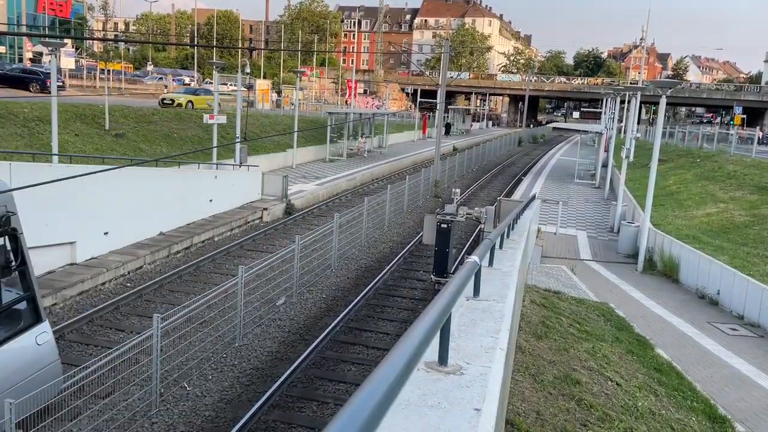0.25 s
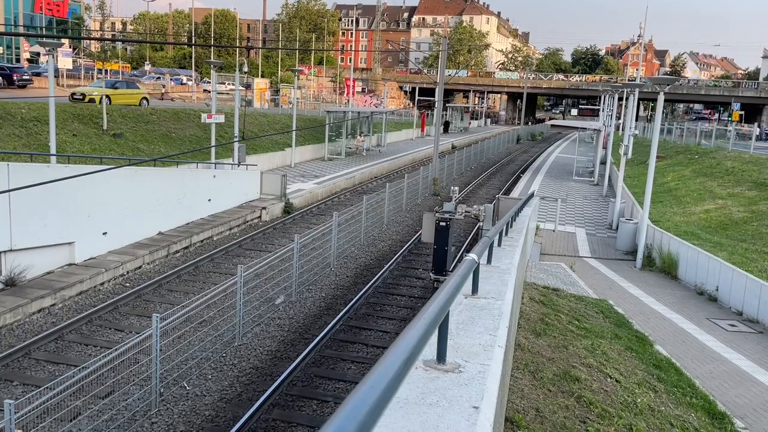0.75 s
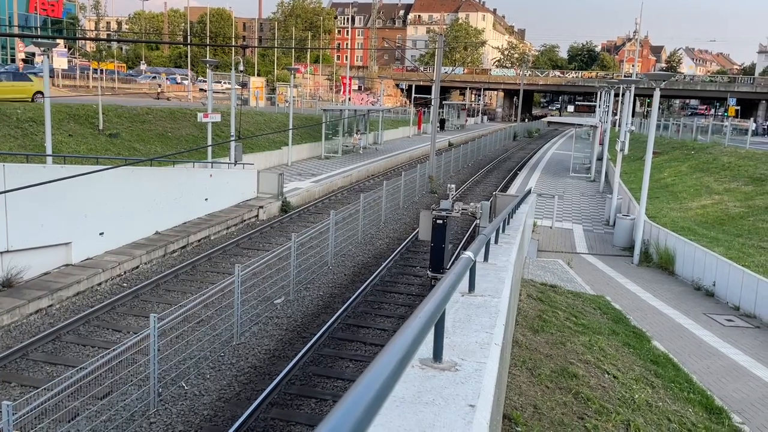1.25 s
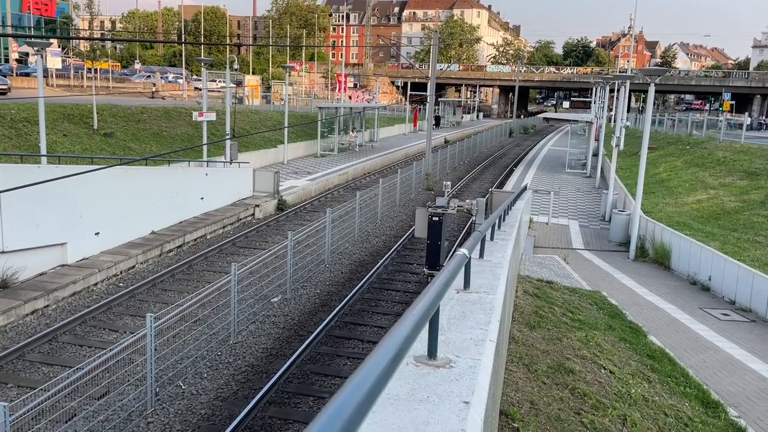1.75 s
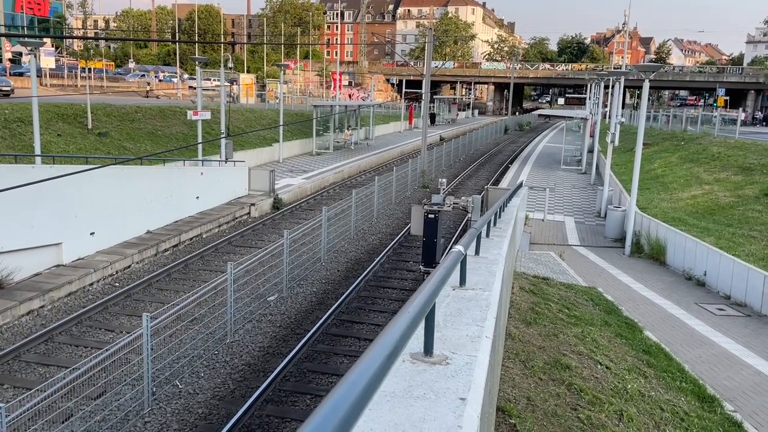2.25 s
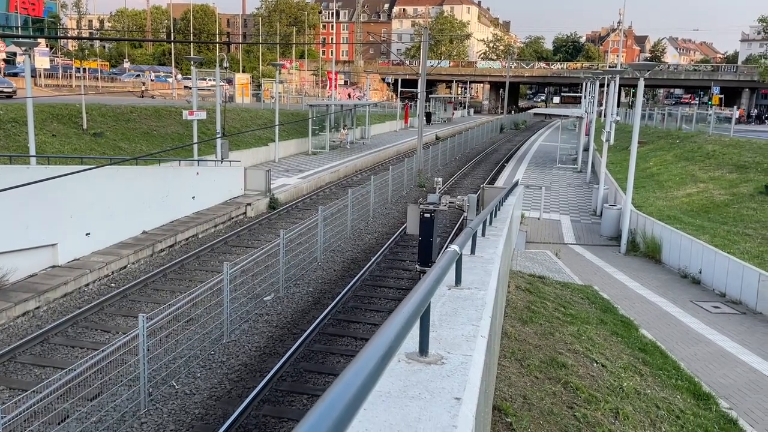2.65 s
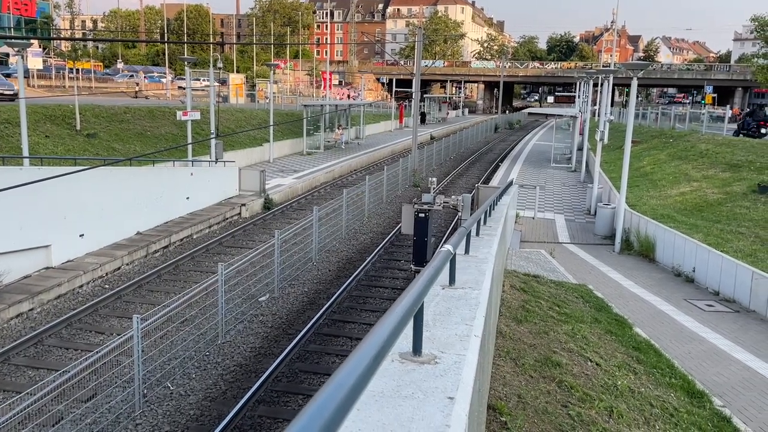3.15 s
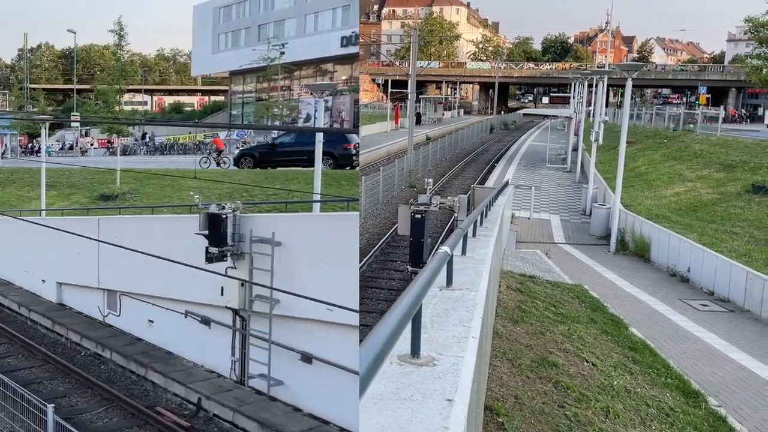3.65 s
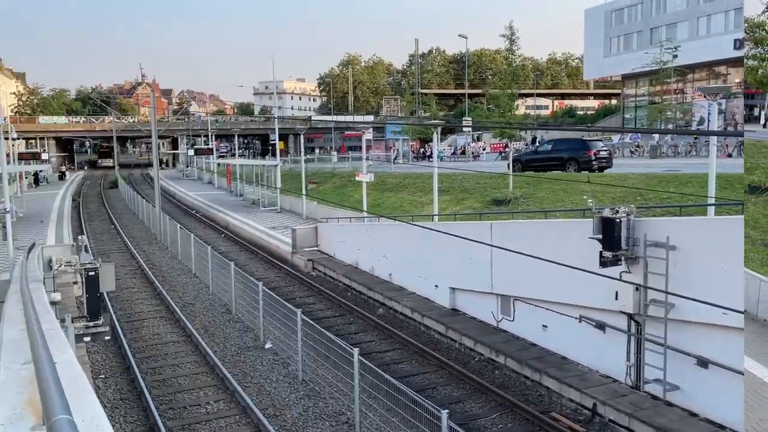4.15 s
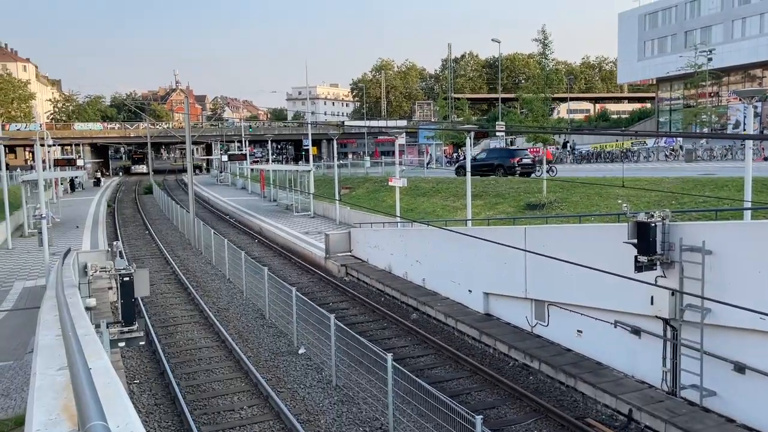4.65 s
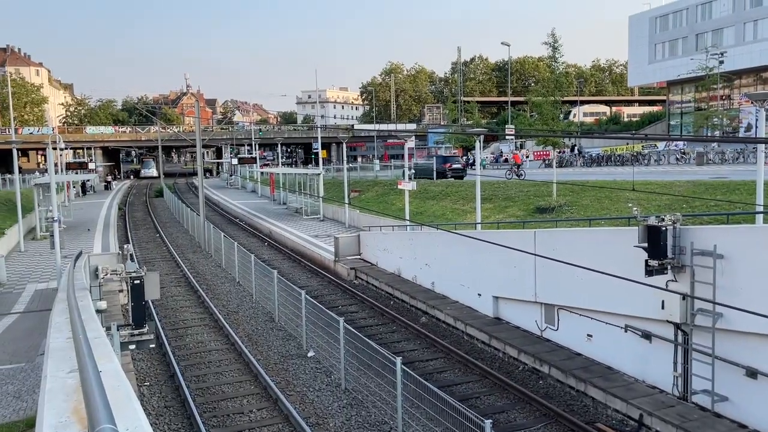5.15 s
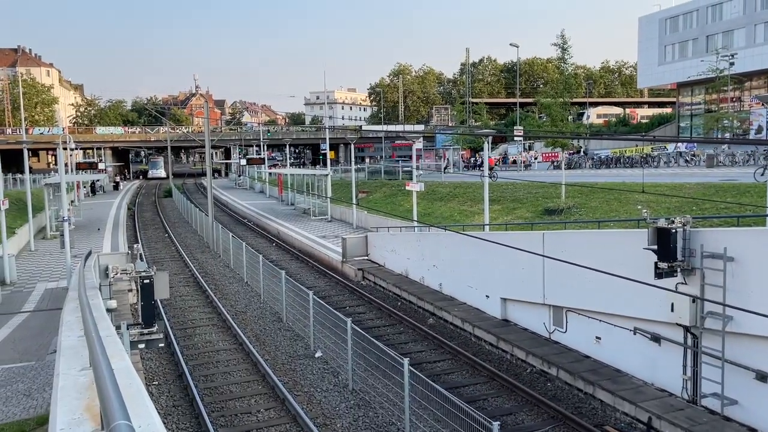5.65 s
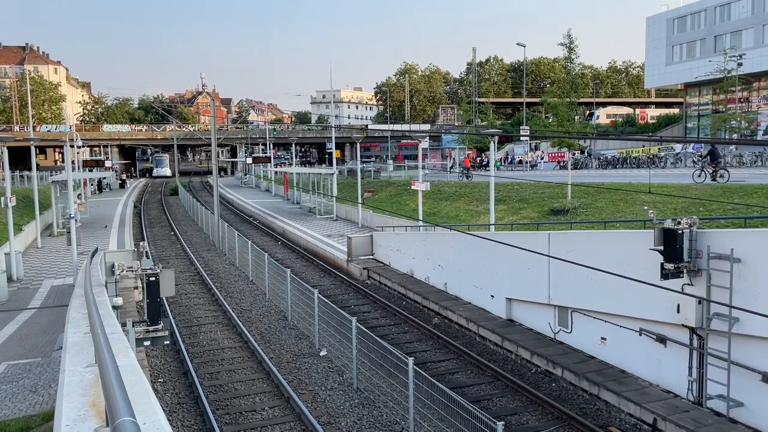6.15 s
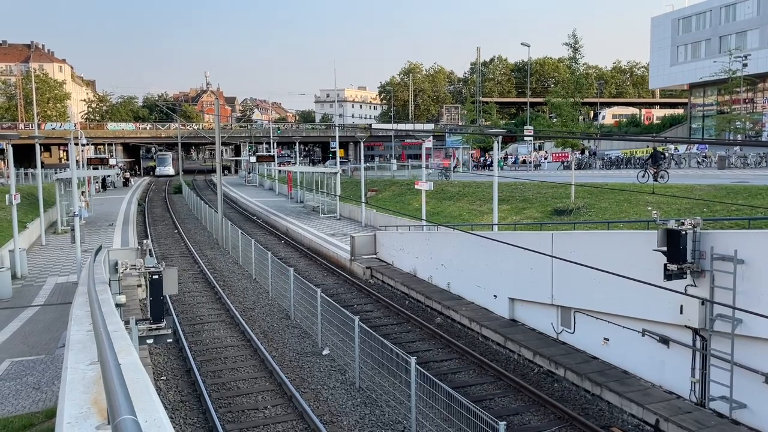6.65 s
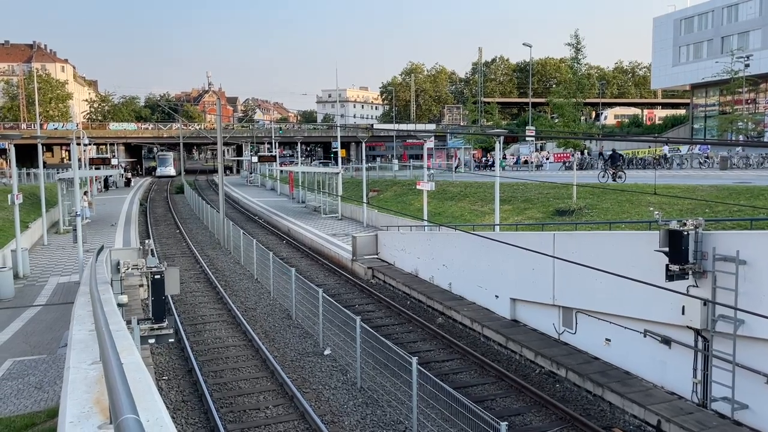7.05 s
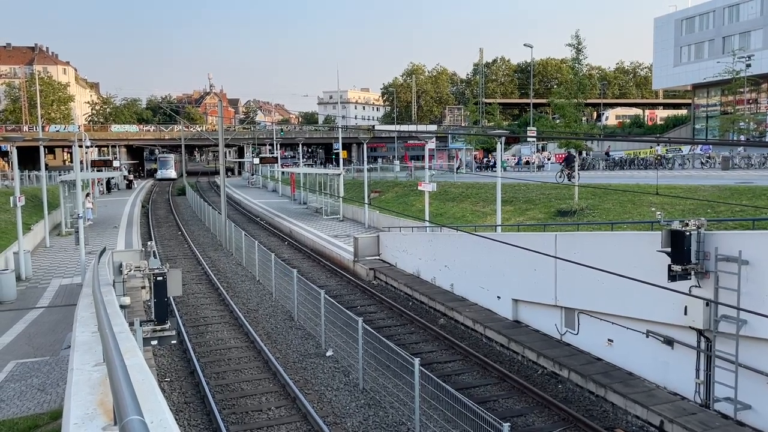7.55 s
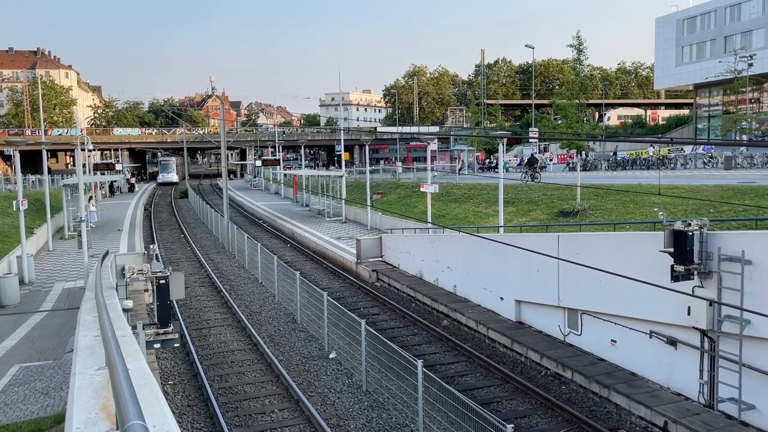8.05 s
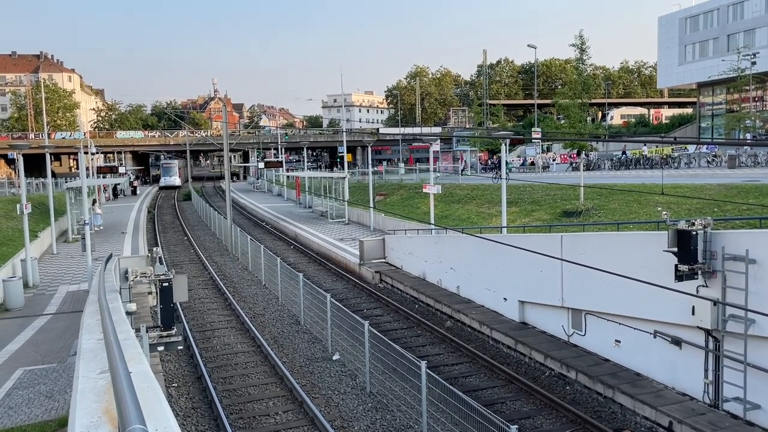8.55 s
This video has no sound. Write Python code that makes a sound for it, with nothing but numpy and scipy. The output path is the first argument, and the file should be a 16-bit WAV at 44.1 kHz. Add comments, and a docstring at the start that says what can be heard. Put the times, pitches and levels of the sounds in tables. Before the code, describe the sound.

Close stereo outdoor pickup beside sunken tracks: heavy train rumble, juddering wheel roar, metallic ringing and irregular clacks dominate the first three and a half seconds, then drop quickly. The distant town appears, low traffic throb and soft tyre wash, with one car humming past. Faint high wheel cries come and go from a far train. A small grainy metal rattle sounds just after seven seconds, then a few muffled low thuds around eight.

```python
"""A light-rail train rolls close by on the left in a concrete cutting: roaring noise, deep booms and decaying knocks.
The near sound fades out around the fourth second and leaves the town: filtered-noise traffic and a sine engine drone.
The wheels of a far train sing thinly in the curve, as noise in narrow resonances.
Near the end loose metal gives a short double clatter of grainy noise, and a few dull sine thuds follow."""
import sys
import numpy as np
from scipy import signal
from scipy.fft import rfft, irfft, next_fast_len
from scipy.io import wavfile
from scipy.ndimage import uniform_filter1d

SR = 44100
rng = np.random.default_rng(int(sys.argv[2]) if len(sys.argv) > 2 else 0)


def to_wav(sig):
    """Store sig (one row per channel, or 1-D mono) as 16-bit WAV at the path in sys.argv[1].

    Samples outside -1..1 are clipped; the rate is SR.
    """
    pcm = np.clip(np.atleast_2d(sig), -1, 1) * 32767
    pcm = np.round(pcm).astype(np.int16)
    wavfile.write(sys.argv[1], SR, pcm.T)  # frames by channels


N = 387638
TIME_S = np.arange(N) / SR

# All levels are relative: later gains and the stereo stage shift them. Swell lengths are those of swell().

# The near train going by. Each row: time in seconds, wheel roar in dB, rail hiss in dB, body rumble in dB.
PASS_LEVELS = [(0, -21.5, -44, -0.5), (1.75, -23, -44, -0.5), (2.3, -25.5, -46.5, -0.5),
               (3.05, -25, -49, -0.5), (3.41, -27.5, -50, -2.5), (3.52, -31, -54, -3.5),
               (3.8, -34, -58, -7), (4.05, -41.5, -65, -17)]
# Spectrum of the wheel roar. Each row: frequency in Hz, density in dB.
ROAR_COLOUR = [(22, -29), (42, -26.5), (65, -1), (120, -3.5), (230, -1), (300, -1), (500, -4), (700, -8),
               (950, -10), (1250, -17), (1800, -19), (2400, -29.5), (4000, -53)]
# Spectrum of the rail hiss. Each row: frequency in Hz, density in dB.
HISS_COLOUR = [(900, -25), (1700, -6), (2350, -6.5), (3200, -11.5), (3900, -14), (4450, -15), (5200, -17),
               (6500, -19.5), (7900, -28.5), (10500, -31.5), (13000, -38)]
# Wheel and rail modes kept ringing by rolling. Each row: frequency in Hz at the loudest time, pole width in Hz,
# level in dB, loudest time in seconds, rise in seconds, fall in seconds, glide in Hz per second.
RAIL_MODES = [(1704, 740, -3.5, 0.89, 2, 2, 0), (1770, 260, 7.5, .9, .2, 0.35, 600.5),
              (2186, 140, 4, 0.74, .25, 0.13, 1), (2260, 220, 1.5, 1.2, 0.19, 0.5, 2),
              (2640, 200, -6.5, 3.6, 1.1, .87, 0), (4390, 380, -6.5, 1.8, 1.7, 0.3, -130),
              (4450, 45, -9.5, 1.5, 1.1, 1.1, 0), (5420, 90, -15, .1, .5, 1.9, 1),
              (5850, 45, -19, 1.2, 1.2, 1.2, 0), (6530, 430, -13, 0.55, 0.38, 1.5, -150)]
# Deep resonances of car body and track bed. Each row: frequency in Hz, pole width in Hz, level in dB.
BODY_MODES = [(88.77, 41.5, -24.5), (175, 71.4, -20.5)]
# Booms that stand out of the rumble. Each row: peak in seconds, length in seconds, frequency in Hz, level in dB.
BOOMS = [(0.033, 0.068, 163, -15), (0.34, 0.13, 93.9, -17.5), (0.377, .24, 212, -21),
         (0.487, 0.077, 97, -19.5), (0.541, 0.075, 164.7, -16), (0.722, 0.14, 178.5, -17.5),
         (0.726, 0.14, 90, -24), (0.911, 0.17, 177.8, -13), (1.012, 0.047, 185, -14.5),
         (1.33, 0.19, 96.7, -23.5), (1.56, 0.039, 162.7, -12), (1.66, 0.085, 166.9, -9.5),
         (1.79, 0.21, 178.7, -20.5), (2.068, 0.065, 88, -20), (2.254, 0.14, 177.5, -15),
         (2.42, 0.15, 85.1, -16.5), (2.586, 0.16, 87.25, -19.5), (2.603, 0.13, 162, -18),
         (2.845, 0.12, 91, -20), (2.926, 0.36, 184.2, -21.5), (3.405, 0.083, 95, -19)]
# Brief dips of the rumble. Each row: centre in seconds, length in seconds, gain in dB.
LULLS = [(0.226, 0.09, 0), (0.8, 0.05, -5), (1.127, 0.04, -19), (1.982, 0.099, -9.5), (3.56, 0.046, -2),
         (3.787, .07, -4.5)]
# Wheels knocking on the rails. Each row: start in seconds, ring in dB, ring pitch in Hz, thump in dB, crack in dB.
KNOCKS = [(0.027, -11, 420, -22, -33), (0.106, -1.5, 480, -2, -20), (0.126, -5, 470, -13, -28),
          (0.139, -5.5, 520, -16, -29), (0.17, -11, 450, -20, -35), (0.216, -13, 400, -22, -35),
          (0.288, -5.5, 500, 2, -22), (0.308, -11, 600, -16, -35), (0.385, -8.5, 400, -13, -32),
          (0.468, -2, 500, -13, -29), (0.487, -6, 470, -20, -34), (0.518, -7, 440, -18, -34),
          (0.538, -10, 480, -14, -35), (0.619, -10, 350, -12, -35), (0.658, -2, 470, -6, -31),
          (0.837, -7, 520, -14, -32), (0.858, -9, 480, -22, -35), (1.03, -9, 560, -22, -36),
          (1.057, -5.5, 430, -12, -33), (1.208, -8, 380, -15, -35), (1.323, -9, 800, -22, -34),
          (1.455, -10.5, 400, -13, -32), (1.585, -10, 440, -20, -35), (1.628, -9, 480, -22, -35),
          (1.68, -12, 480, -22, -36), (1.794, -9.5, 420, -12, -34), (1.945, -7, 450, -22, -34),
          (2.14, -13, 480, -16, -35), (2.324, -12.5, 480, -16, -38), (2.433, -15, 700, -24, -37),
          (2.512, -14, 480, -20, -38), (3.004, -10, 530, -18, -36), (3.094, -10.5, 400, -17, -42),
          (3.615, -14.5, 440, -23, -47), (3.678, -14.5, 440, -25, -49)]
# Bogie modes struck by a knock. Each row: multiple of the ring pitch, level in dB, t60 in seconds.
BOGIE_MODES = [(0.661, 2, 0.07), (0.819, -2.5, 0.11), (1, 1, 0.097), (1.19, -1, 0.059), (1.45, -5, 0.058),
               (1.83, -6.5, 0.064), (2.3, -28, .04)]
# Microphone pair facing the near train. Each row: frequency in Hz, coherence from 0 to 1,
# phase lead of left in radians, left minus right in dB.
NEAR_STEREO = [(45, 1, 0.12, -1), (161, 0.95, 0.45, -3.5), (326, 0.67, 1.3, -0.5), (664, 0.77, 1.7, 2),
               (940, 0.86, 1.64, 0.5), (1250, 1, 2.16, -1.5), (1560, 0.62, 2.74, -5),
               (1904, 0.65, 3.36, -1.5), (2660, 0.41, 6.4, -1.5), (3340, 0.18, 7.8, -1.5),
               (4400, 0.98, 7.44, -0.5), (5160, 0.12, 6.1, -1.5), (5780, 0.92, 4.74, -3.5),
               (12070, 1, 14.17, 1)]

# Wheels of the far train: one faint held note: peak in seconds, length in seconds, frequency in Hz, level in dB.
HELD_NOTE = (5.35, 4.0, 2620, -58.5)
# Cries that stand out of it. Each row: peak in seconds, length in seconds, frequency in Hz, level in dB.
CRIES = [(4.2, .3, 2625, -58), (4.46, .14, 2615, -56), (4.61, .13, 2606, -52.5), (4.76, .1, 2612, -53),
         (4.9, .12, 2640, -55), (5.0, .12, 2605, -54), (4.92, .6, 2265, -56.5), (5.33, .1, 2620, -53),
         (5.44, .1, 2290, -57), (5.8, .5, 2295, -62), (6.15, .11, 2572, -52), (6.3, .18, 2580, -57),
         (7.0, .16, 2632, -56), (7.02, .18, 2552, -57.5), (7.08, .4, 2380, -61), (7.27, .08, 2550, -59),
         (7.5, .22, 2546, -57)]
# Flange scrape: peak in seconds, length in seconds, frequency in Hz, pole width in Hz, level in dB.
SCRAPE = (4.2, 0.5, 2920, 180, -58)
# Engine on the road. Each row: time in seconds, firing frequency in Hz, level in dB.
ENGINE_DRONE = [(3.75, 59, -38), (3.95, 60, -30.5), (4.2, 63, -28.5), (4.4, 64, -28.5), (4.62, 64.5, -26.5),
                (4.83, 64, -30), (5.0, 62, -37), (5.2, 60, -44)]
# Jolts of loose metal. Each row: start in seconds, rattle in dB, ping in dB, t60 in seconds.
CLATTERS = [(7.201, -50, -63, .14), (7.216, -54.5, -65, .14), (7.236, -47, -59.5, .1),
            (7.253, -59, -69, .45), (7.35, -64, -75, .6), (7.385, -66, -76, .5), (8.066, -73, -70, .25)]
# Spectrum of the rattling metal. Each row: frequency in Hz, density in dB.
CLATTER_COLOUR = [(600, -22), (1500, -6), (2850, 0), (3120, -4), (3350, 1), (4050, -10), (4480, -4.5),
                  (5400, -14), (6700, -11), (7500, -21), (8400, -17), (9400, -24), (12000, -31),
                  (14000, -47)]
# Dull far thuds. Each row: start in seconds, pitch in Hz, level in dB.
THUDS = [(8.005, 85, -24), (8.04, 58, -25), (8.16, 160, -26), (8.175, 60, -24), (8.21, 56, -19),
         (8.425, 65, -27), (8.512, 90, -18.5)]
# Tyres of the passing car. Each row: time in seconds, centre in Hz, level in dB.
TYRE_SIZZLE = [(4.1, 5300, -83), (4.35, 5560, -78), (4.75, 5850, -75), (5.15, 6200, -77), (5.5, 6450, -84)]
# Hollow far tone. Each row: peak in seconds, length in seconds, level in dB.
GROANS = [(4.43, .12, -50), (4.95, 0.09, -39.5)]
# Town traffic. Each row: time in seconds, rumble in dB, tyre wash in dB, deep throb in dB.
TRAFFIC_LEVELS = [(4.1, -42.5, -46, -38.5), (4.7, -44.5, -45.5, -44), (5.5, -43.5, -48, -36),
                  (6.05, -44, -49, -42), (6.6, -45.5, -50, -39.5), (7.2, -44.5, -49.5, -39),
                  (7.9, -45, -50, -39), (8.3, -43, -50, -37), (8.79, -43.5, -50, -43)]
# Spectrum of the deep throb. Each row: frequency in Hz, density in dB.
THROB_COLOUR = [(18, -16), (32, -1), (50, 26.5), (70, 8), (100, -1.5), (200, -60)]
# Spectrum of the traffic rumble. Each row: frequency in Hz, density in dB.
RUMBLE_COLOUR = [(45, -20.5), (85, 0.5), (160, -5), (230, -11.5), (330, -17.5), (700, -56)]
# Spectrum of the tyre wash. Each row: frequency in Hz, density in dB.
WASH_COLOUR = [(120, -5.5), (300, -2.5), (500, -1.5), (660, -5.5), (1000, -6.5), (1400, -12.5),
               (2100, -16.5), (3000, -25), (4500, -37)]
# Spectrum of the far hiss. Each row: frequency in Hz, density in dB.
FAR_HISS_COLOUR = [(1800, -18), (3400, 0), (4200, -4.5), (5600, -9), (6800, -12), (8400, -24), (9800, -31),
                   (11200, -30), (13000, -41)]
# The same pair in the open town. Each row: frequency in Hz, coherence from 0 to 1,
# phase lead of left in radians, left minus right in dB.
FAR_STEREO = [(45, 0.92, 0.03, -2), (170, 1, 0.37, -2), (340, 0.8, 0.13, -2), (620, 0.72, 0.66, 0.5),
              (1300, 0.23, 0.36, -2), (2780, 0.27, 0.8, -0.2), (6000, 0.091, -1.5, -0.5),
              (7100, .1, -3.5, -2), (8100, 1, -6.5, -1), (9800, .3, -4, 3), (11200, .8, -6.3, -2)]

THUMP_HZ, THUMP_T60_S, CRACK_T60_S = 149, 0.057, .06
STRIKE_ATTACK_S = .0022  # knocks and clatter
THUD_ATTACK_S, THUD_T60_S = .003, .17
ECHO_DELAY_S, ECHO_SHRINK_S_PER_S = .00068, .000095  # delay holds at the echo's peak
ECHO_PEAK_S, ECHO_LENGTH_S, ECHO_GAIN = 4.8, 1.6, .2
LOW_CUT_HZ, EDGE_HZ, CEILING = 33, 14200, .92


def gain_of(db):
    """Amplitude factor of a level in dB."""
    return 10 ** (np.asarray(db) / 20)


def evened(x):
    """Scales to rms 1."""
    return x / np.sqrt(np.mean(x ** 2) + 1e-20)


def read(points, hz):
    """Every column of a table, joined on a log-frequency axis."""
    f, *columns = np.transpose(points)
    return [np.interp(np.log(hz + 1), np.log(f + 1), c) for c in columns]


def levels(rows, fade_db_per_s=50):
    """Gains from the dB columns of a curve; outside its times they fall steadily."""
    s, *columns = np.transpose(rows)
    outside_s = np.maximum(s[0] - TIME_S, 0) + np.maximum(TIME_S - s[-1], 0)
    return [gain_of(np.interp(TIME_S, s, c) - fade_db_per_s * outside_s) for c in columns]


def add(mix, start_s, sound):
    """Adds a sound into the mix, cut off at the end."""
    part = mix[..., max(round(start_s * SR), 0):][..., :sound.shape[-1]]
    part += sound[..., :part.shape[-1]]


def swell(peak_s, length_s):
    """A smooth rise and fall, about 9 dB down at the ends of its length."""
    return np.exp(-np.minimum((2 * (TIME_S - peak_s) / length_s) ** 2, 20))


def swells(rows):
    """The summed gain of several swells."""
    return sum(gain_of(db) * swell(s, length_s) for s, length_s, db in rows)


def wander(hz):
    """Random fluctuation of rms 1, low-passed softly around hz."""
    size = next_fast_len(N, True)
    smooth = np.exp(-np.minimum(np.fft.rfftfreq(size, 1 / SR) / hz, 10) ** 2)
    return evened(irfft(rfft(rng.standard_normal(size)) * smooth, size)[:N])


def steadied(x, window_s):
    """Takes out swells slower than the window and keeps the fast beating."""
    power = uniform_filter1d(x ** 2, max(int(window_s * SR), 1), axis=-1)
    return x / np.sqrt(abs(power) + 1e-12)


def tone(hz, waver):
    """A sine of rms 1 whose pitch strays by the share waver."""
    return evened(np.sin(2 * np.pi * (rng.random() + np.cumsum(hz * (1 + waver)) / SR)))


def noise(colour, patchy_db, size=1024, skirt_db_per_octave=30):
    """Two unrelated noises of one colour, patchy in time and frequency, falling steadily above its top."""
    hz, _, z = signal.stft(rng.standard_normal((2, N)), SR, nperseg=size)
    patches = uniform_filter1d(rng.standard_normal(z.shape[1:]), size=10, axis=0)
    patches = evened(uniform_filter1d(patches, size=6, axis=1))
    octaves_above = np.log2(np.maximum(hz / colour[-1][0], 1))
    shape_db = read(colour, hz)[0] - skirt_db_per_octave * octaves_above
    shaped = z * gain_of(shape_db[:, None] + patchy_db * patches)
    return evened(signal.istft(shaped, SR, nperseg=size)[1][:, :N])


def ringing(hz, width_hz, size=N):
    """Two unrelated noises in a double-pole resonance, whose centre may move."""
    r = np.exp(-np.pi * width_hz / SR)
    drive = rng.standard_normal((2, 2, size + SR // 8))  # the extra eighth lets the filter settle
    slow = signal.lfilter([1], [1, -2 * r, r * r], drive)[..., -size:]
    angle = 2 * np.pi * np.cumsum(hz * np.ones(size)) / SR
    return evened(slow[0] * np.cos(angle) + slow[1] * np.sin(angle))


def rolling(roar_db=3, hiss_db=7.5, judder_db=0.4, flicker_db=0.67):
    """Rough steel on steel: juddering roar, hiss, and modes that swell, glide and rasp as their wheels go by."""
    roar_gain, hiss_gain, _ = levels(PASS_LEVELS)
    judder = wander(47)
    roar = steadied(noise(ROAR_COLOUR, patchy_db=1.5, size=2048), 0.056)
    roar = roar * roar_gain * gain_of(roar_db + judder_db * judder)
    hiss = noise(HISS_COLOUR, patchy_db=1.16) * gain_of(hiss_db + flicker_db * judder)
    modes = 0
    for hz, width_hz, db, s, rise_s, fall_s, glide_hz_per_s in RAIL_MODES:
        passing = np.exp(-((TIME_S - s) / np.where(TIME_S < s, rise_s, fall_s)) ** 2)
        flutter_db = 1.5 * wander(12) + 1.5 * wander(90)
        mode = ringing(hz + glide_hz_per_s * (TIME_S - s), width_hz)
        modes = modes + gain_of(db + flutter_db) * passing * mode
    return roar + hiss_gain * (hiss + modes)


def booming(surge_db=1.2, boom_db=-1.5, waver=0.02):
    """Two deep resonances churn as the train passes, with brief dips; now and then a sine booms out."""
    lull_db = sum(db * swell(s, length_s) for s, length_s, db in LULLS)
    rumble = sum(steadied(ringing(hz, width_hz), .08) * gain_of(db + surge_db * wander(20))
                 for hz, width_hz, db in BODY_MODES)
    drift = waver * wander(18.2)
    booms = sum(gain_of(db + boom_db) * swell(s, length_s) * tone(hz, drift)
                for s, length_s, hz, db in BOOMS)
    return rumble * levels(PASS_LEVELS)[2] * gain_of(lull_db) + np.outer([1, 0], booms)


def knocks(rattle_db=-16, rattle_t60_s=0.23):
    """Each blow thumps the track bed and rings the bogie, with a metallic crack and a longer rattle off the walls."""
    t, out = np.arange(SR // 3) / SR, np.zeros((2, N))
    crack_band = signal.butter(3, [900, 3000], "band", fs=SR, output="sos")
    rattle_band = signal.butter(2, [250, 850], "band", fs=SR, output="sos")

    def burst(band, db, t60_s):
        """Band noise dying away exponentially."""
        return evened(signal.sosfilt(band, rng.standard_normal((2, len(t))))) * gain_of(db - 60 * t / t60_s)

    for s, ring_db, pitch_hz, thump_db, crack_db in KNOCKS:
        ring = sum(gain_of(db - 60 * t / t60_s) * np.sin(2 * np.pi * (pitch_hz * ratio * t + rng.random()))
                   for ratio, db, t60_s in BOGIE_MODES)
        ring = gain_of(ring_db) * ring / abs(ring).max()
        thump = gain_of(thump_db - 60 * t / THUMP_T60_S) * np.sin(2 * np.pi * THUMP_HZ * t)
        crack = burst(crack_band, crack_db, CRACK_T60_S)
        rattle = burst(rattle_band, ring_db + rattle_db, rattle_t60_s)
        blow = np.outer([1, 0], ring + thump) + crack + rattle
        add(out, s, blow * (1 - np.exp(-t / STRIKE_ATTACK_S)))
    return out


def squeal(width_hz=46, cry_width_hz=24, stutter_db=1.4):
    """Flanges scrape early on; slipping wheels keep one narrow mode singing, and short cries stand out."""
    s, length_s, hz, scrape_width_hz, db = SCRAPE
    out = gain_of(db) * swell(s, length_s) * ringing(hz, scrape_width_hz)
    s, length_s, hz, db = HELD_NOTE
    drift = 1 + .004 * wander(8)
    held = steadied(ringing(hz * drift, width_hz), .06)
    out += gain_of(db + stutter_db * wander(18)) * swell(s, length_s) * held
    for s, length_s, hz, db in CRIES:
        t = np.arange(-length_s, length_s, 1 / SR)
        cry = steadied(ringing(hz, cry_width_hz, size=len(t)), .04)
        add(out, s - length_s, gain_of(db) * np.exp(-(2 * t / length_s) ** 2) * cry)
    return out


def engine(waver=0.0052, throb_db=0.5):
    """A low exhaust note, a wavering sine, rises a little, sinks again and dies away."""
    s, hz, db = np.transpose(ENGINE_DRONE)
    turns = np.cumsum(np.interp(TIME_S, s, hz) * (1 + waver * wander(4.5))) / SR
    note = evened(np.sin(2 * np.pi * turns)) * levels(np.c_[s, db])[0] * gain_of(throb_db * wander(13))
    return np.array([note, np.zeros(N)])


def clatter(ping_hz=6750, ping_width_hz=380):
    """Loose metal rattles: each jolt is a decaying grainy burst with a thin ping."""
    grains = gain_of(2 * wander(400))
    rattle = steadied(grains * noise(CLATTER_COLOUR, patchy_db=2, size=256), .012)
    ping = steadied(ringing(ping_hz, ping_width_hz), .02)
    out = np.zeros((2, N))
    for s, rattle_db, ping_db, t60_s in CLATTERS:
        t = np.maximum(TIME_S - s, 0)
        envelope = (1 - np.exp(-t / STRIKE_ATTACK_S)) * gain_of(-60 * t / t60_s)
        out += envelope * (gain_of(rattle_db) * rattle + gain_of(ping_db) * ping)
    return out


def thuds(overtone_ratio=1.7, overtone_db=-6):
    """Each thud is a few deep cycles with a shorter overtone."""
    t, out = np.arange(SR // 3) / SR, np.zeros((2, N))
    decay = gain_of(-60 * t / THUD_T60_S)
    for s, hz, db in THUDS:
        overtone = gain_of(overtone_db) * decay * np.sin(2 * np.pi * hz * overtone_ratio * t)
        ring = np.sin(2 * np.pi * hz * t) + overtone
        add(out[0], s, gain_of(db) * (1 - np.exp(-t / THUD_ATTACK_S)) * decay * ring)
    return out


def far_tones(groan_hz=516, groan_width_hz=18, sizzle_width_hz=520):
    """A hollow tone and the rising sizzle of the car's tyres, both resonant noise, stand briefly out of the wash."""
    s, hz, db = np.transpose(TYRE_SIZZLE)
    sizzle = levels(np.c_[s, db])[0] * ringing(np.interp(TIME_S, s, hz), sizzle_width_hz)
    return sizzle + swells(GROANS) * steadied(ringing(groan_hz, groan_width_hz), 0.072)


def skimmed(hiss):
    """A passing car's hiss also arrives off the road, ever less late, so comb ridges and hollows sweep upwards."""
    delay_s = ECHO_DELAY_S - ECHO_SHRINK_S_PER_S * (TIME_S - ECHO_PEAK_S)
    share = ECHO_GAIN * swell(ECHO_PEAK_S, ECHO_LENGTH_S)
    echo = np.array([np.interp(TIME_S - delay_s, TIME_S, h) for h in hiss])
    return (hiss + share * echo) / np.hypot(1, share)


def town(lumpy_db=3.5, rumble_db=5.5, wash_db=7.0, hiss_db=-15.0):
    """Distant traffic: a lumpy rumble under a smooth wash of tyres and rails, which is brighter when louder."""
    rumble_gain, wash_gain, throb_gain = levels(TRAFFIC_LEVELS, fade_db_per_s=7.5)
    throb = steadied(noise(THROB_COLOUR, patchy_db=5.0, size=4096), 0.15)
    throb = throb * throb_gain * gain_of(lumpy_db * wander(5.7))
    rumble = steadied(noise(RUMBLE_COLOUR, patchy_db=1.0, size=4096), 0.2) * rumble_gain * gain_of(rumble_db)
    wash = noise(WASH_COLOUR, patchy_db=1.0, size=2048) * wash_gain * gain_of(wash_db)
    hiss_gain = wash_gain ** 2 / wash_gain[-1] * gain_of(hiss_db)  # twice the wash's swing in dB
    return throb + rumble + wash + hiss_gain * skimmed(noise(FAR_HISS_COLOUR, patchy_db=1.0))


def ports(pair, table):
    """The first signal reaches both microphones alike; the second, with opposite signs, sets them apart."""
    size = next_fast_len(N + SR)
    coherence, phase_rad, balance_db = read(table, np.fft.rfftfreq(size, 1 / SR))
    coherence = np.clip(coherence, 0, 1)
    direct, scattered = rfft(pair, size) * np.sqrt([(1 + coherence) / 2, (1 - coherence) / 2])
    lead = gain_of(balance_db / 2) * np.exp(.5j * phase_rad)  # half to each side
    return irfft(np.array([(direct + scattered) * lead, (direct - scattered) / lead]), size)[:, :N]


def scene():
    """The near train leads in the left channel; the town has its own, more central stereo image."""
    near = rolling() + booming() + knocks()
    far = squeal() + engine() + clatter() + thuds() + far_tones() + town()
    return ports(near, NEAR_STEREO) + ports(far, FAR_STEREO)


def record(dry):
    """The microphone's bass roll-off, a soft ceiling on the highest crests, tiny end fades, then the band limit."""
    thinned = signal.sosfilt(signal.butter(4, LOW_CUT_HZ, "high", fs=SR, output="sos"), dry)
    rounded = thinned / (1 + (thinned / CEILING) ** 6) ** (1 / 6)
    eased = rounded * signal.windows.tukey(N, .0005)
    band_limit = signal.firwin(511, EDGE_HZ, window=("kaiser", 9), fs=SR)
    return signal.oaconvolve(eased, band_limit[None], "same")


dry = scene()
out = record(dry)
to_wav(out)
```